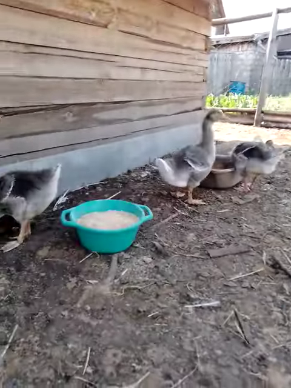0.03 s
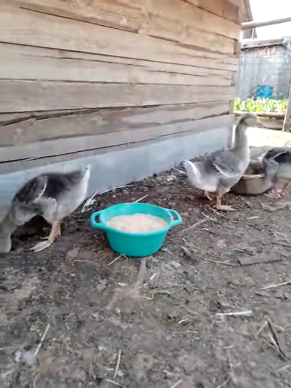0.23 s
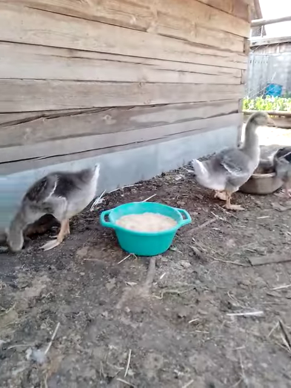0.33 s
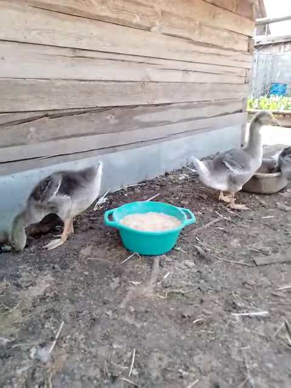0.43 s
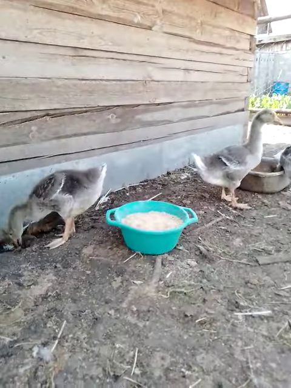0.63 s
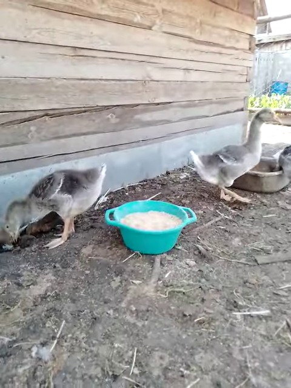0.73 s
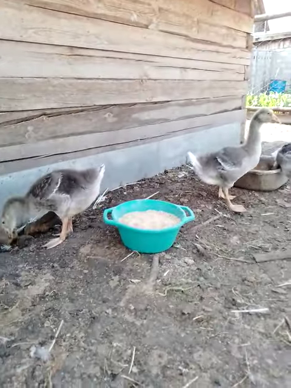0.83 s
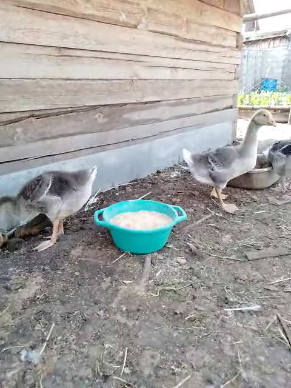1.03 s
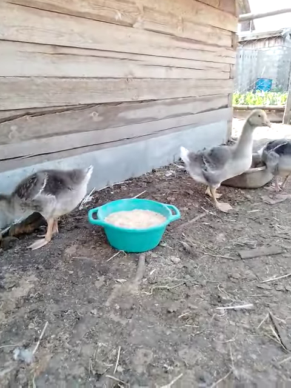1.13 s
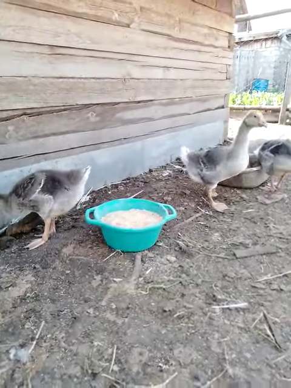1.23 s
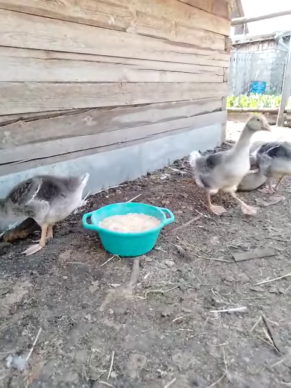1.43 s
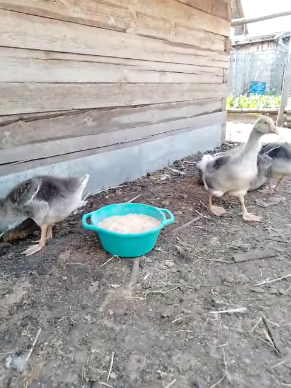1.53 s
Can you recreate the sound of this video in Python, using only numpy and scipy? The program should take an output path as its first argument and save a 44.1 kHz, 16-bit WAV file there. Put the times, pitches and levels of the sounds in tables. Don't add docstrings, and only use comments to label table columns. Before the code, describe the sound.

Young geese peep close by outdoors: faint chirps at first, one loud, bright arched peep near 0.25 s, then softer, duller overlapping peeps off a wooden wall until about 0.8 s. Small bill ticks start near 0.95 s, sharpest at 1.1 s, with short nasal honks at 1.1 and 1.25 s. A hoarse distant bird call echoes from 1.1 to 1.6 s over faint flock peeps, quiet hush and light wind rumble.

```python
import sys
import numpy as np
from scipy import signal
from scipy.fft import rfft, irfft, next_fast_len
from scipy.io import wavfile
from scipy.ndimage import uniform_filter1d, map_coordinates

SR = 44100
rng = np.random.default_rng(int(sys.argv[2]) if len(sys.argv) > 2 else 0)


def waveform_to_disk(signal):
    frames = np.transpose(np.atleast_2d(signal))
    scaled = np.clip(frames, -1, 1) * 32767
    samples = np.round(scaled).astype(np.int16)
    wavfile.write(sys.argv[1], SR, samples)


def ratio_of_db(decibels):
    return 10 ** (np.asarray(decibels, float) / 20)


N = 70560
T = np.arange(N) / SR


def unit(x):
    return x / np.sqrt(np.mean(x ** 2) + 1e-20)


def along(points, hz):
    f, v = np.transpose(points)
    return np.interp(np.log(hz + 1), np.log(f + 1), v)


def level(rows):
    return ratio_of_db(np.interp(T, *np.transpose(rows)))


def wobble(rate):
    return map_coordinates(rng.standard_normal(2000), [T * rate])


def filtered(x, response):
    m = next_fast_len(N + SR // 2)
    return irfft(rfft(x, m) * response(np.fft.rfftfreq(m, 1 / SR)), m)[:N]


def rush(spectrum):
    return unit(filtered(rng.standard_normal(N), lambda hz: ratio_of_db(along(spectrum, hz))))


def tail(x, t60):
    echoes = rng.standard_normal(SR // 2) * ratio_of_db(-60 * T[:SR // 2] / t60)
    return signal.fftconvolve(x, echoes / np.linalg.norm(echoes))[:N]


def voice(rows, fall_db, colour, count, flutter_db, fades=0, rasp_db=0):
    s, hz, db = np.transpose(rows)
    flutter_rate, jitter, rasp_rate = 150, 0.00395, 350
    pitch = uniform_filter1d(np.interp(T, s, hz), size=200)
    pitch = pitch * (1 + jitter * flutter_db * wobble(flutter_rate))
    sounding = (T > s[0]) * (T < s[-1])
    gain = ratio_of_db(np.interp(T, s, db) + flutter_db * wobble(flutter_rate)) * sounding
    gain = uniform_filter1d(gain, size=60)

    k = np.arange(1, count + 1)[:, None]
    turns = np.cumsum(pitch) / SR + rng.random()
    harmonic_db = fall_db * (k - 1) + along(colour, k * pitch)
    harmonic_db = harmonic_db + fades * (k == 2) * (T - s[0]).clip(0)
    if rasp_db:
        rasp = np.array([wobble(rasp_rate) for _ in k])
        harmonic_db = harmonic_db + rasp_db * rasp * (k - 1).clip(0, 3)
    return np.sqrt(2) * gain * (ratio_of_db(harmonic_db) * np.sin(2 * np.pi * k * turns)).sum(0)


def glide(s, length, first_hz, last_hz, db):
    mid_hz = (first_hz + last_hz) / 2
    return [(s, first_hz, db - 18),
            (s + 0.4 * length, (first_hz + mid_hz) / 2, db + 1.5),
            (s + 0.509 * length, mid_hz, db),
            (s + length, last_hz, db - 14.0)]


def facing_peeps():
    # time in seconds, pitch in Hz, level in dB.
    loud_arch = [(.228, 1582, -57), (.251, 1686, -36.5), (.265, 1766, -34), (.275, 1977, -30),
                 (.288, 2150, -32), (.303, 1980, -26), (.315, 1753, -31.5), (.329, 1609, -37.5),
                 (.358, 1405, -61)]
    early_arch = [(.084, 1540, -55), (0.099, 1600, -53), (0.124, 1643, -50), (.155, 1870, -64.5),
                  (0.174, 1790, -67)]
    # frequency in Hz, gain in dB.
    peep_throat = [(2300, 0), (3400, 6), (3950, -26), (4250, -36), (4900, -3), (5350, 1), (6200, -33),
                   (6750, -6), (7500, -45)]
    thin_throat = [(3300, 3), (3700, 9.5), (4600, -34), (6200, -19.5), (6600, -14), (7000, -36)]
    # start in seconds, length in seconds, first and last pitch in Hz, level in dB.
    thin_peeps = [
        (0.076, 0.1, 1613, 1448, -57),
        (0.783, 0.027, 1763, 1770, -63),
        (0.888, 0.023, 1690, 1750, -68.5),
    ]

    arched = sum(voice(rows, -11, peep_throat, count=4, flutter_db=1.2, fades=-130, rasp_db=1.6)
                 for rows in (loud_arch, early_arch))
    thin = sum(voice(glide(*g), -2, thin_throat, count=4, flutter_db=-1.0) for g in thin_peeps)
    return arched + filtered(thin, lambda hz: 1 / (1 + (2300 / (hz + 1)) ** 4))


def turned_peeps():
    # time in seconds, pitch in Hz, level in dB.
    first_arch = [(.405, 1400, -67), (.415, 1670, -61), (.432, 2050, -62), (.446, 2126, -54.5),
                  (.462, 2360, -64.5), (.477, 2220, -53), (.49, 2114, -57), (.508, 2220, -54),
                  (.518, 2330, -59.5)]
    second_arch = [(.47, 1500, -75.5), (0.494, 1722, -48.5), (.506, 1733, -42), (0.513, 1928, -48),
                   (0.525, 2500, -48.5), (.538, 2195, -58), (0.546, 1753, -50.5), (.565, 1500, -80.5)]
    third_arch = [(.526, 1390, -65.5), (0.537, 1754, -67), (.55, 2066, -50), (.557, 2202, -46.5),
                  (0.576, 2280, -47.5), (0.594, 2470, -55), (0.605, 2370, -52.5), (0.614, 1867, -52.5),
                  (.63, 1620, -85)]
    last_arch = [(0.669, 1488, -73), (0.689, 1696, -55), (0.703, 1758, -46), (.713, 1885, -45.5),
                 (.723, 2569, -49.5), (0.734, 2505, -59), (0.744, 1903, -49.5), (0.76, 1596, -78)]
    # start
    # in seconds, length in seconds, first and last pitch in Hz, level in dB.
    glides = [(-.02, 0.054, 1553, 1794, -55.5), (0.025, 0.014, 1458, 1350, -50),
              (0.107, 0.077, 1460, 1461, -55.5), (0.21, 0.027, 1350, 1425, -61.5),
              (0.281, 0.028, 1480, 1360, -51), (.325, 0.025, 1768, 1950, -46.5),
              (.326, 0.021, 2510, 2250, -54), (0.455, 0.019, 2830, 2850, -65),
              (0.578, 0.024, 2960, 2850, -56), (0.706, 0.039, 1895, 2290, -53),
              (0.72, 0.032, 2830, 2820, -72), (1.076, 0.022, 1433, 1620, -55), (1.241, .028, 560, 687, -61)]
    # frequency in Hz, gain in dB.
    turned_throat = [(1500, 0), (1750, 2), (1950, 0), (2500, 2), (3400, -1), (4200, -7), (5200, -10)]

    arched = sum(voice(rows, -16, turned_throat, count=2, flutter_db=4, rasp_db=4)
                 for rows in (first_arch, second_arch, third_arch, last_arch))
    return arched + sum(voice(glide(*g), 0, turned_throat, count=1, flutter_db=4.5) for g in glides)


def honks():
    # time in seconds, pitch in Hz, level in dB.
    first_honk = [(1.094, 791, -66), (1.104, 808.6, -50.5), (1.114, 813, -40), (1.121, 755, -43.5),
                  (1.128, 735.5, -43.5), (1.14, 745.7, -52.5), (1.158, 750, -61)]
    second_honk = [(1.252, 770, -52), (1.264, 825, -45.5), (1.274, 876.5, -47.5), (1.286, 900.5, -44.5),
                   (1.309, 919.4, -41), (1.318, 941, -58), (1.328, 890, -61)]
    # frequency in Hz, gain in dB.
    first_throat = [(740, -3.5), (800, -2.5), (1490, 15), (1590, -8), (2350, 1), (3100, 4), (4000, 3.5),
                    (5500, -24)]
    second_throat = [(820, -15.5), (890, 1), (920, -7.5), (1840, 9.5), (2700, 0.5), (3650, -0.5),
                     (4500, -17), (5300, -6), (5600, -27.5)]
    return sum(voice(rows, -4, colour, count=7, flutter_db=1.88, rasp_db=2.2)
               for rows, colour in ((first_honk, first_throat), (second_honk, second_throat)))


def wall_echo(away):
    dull = filtered(away, lambda hz: 1 / (1 + (hz / 3000) ** 6))
    bounces = np.zeros(SR // 10)
    delay_s = rng.random(7) * 0.018
    bounces[(delay_s * SR + 40).astype(int)] = ratio_of_db(-9) * rng.choice([-1, 1], 7)
    return signal.fftconvolve(dull, bounces)[:N] + tail(dull, 0.065)


def air(near):
    # frequency in Hz, density in dB per Hz.
    breath = [(1000, -28), (1500, 2), (2600, 0.5), (4000, -3), (5700, -9), (6800, -32)]
    loudness = np.sqrt(np.abs(uniform_filter1d(near ** 2, size=500)))
    return ratio_of_db(-29.5) * loudness * rush(breath)


def ticks_and_feet():
    # start in seconds, ring in dB, ring pitch in Hz, snap in dB, snap band top in Hz.
    bill_ticks = [
        (0.9593, -45.5, 3230, -39.5, 8700),
        (0.988, -71, 6100, -58.5, 13400),
        (1.037, -52, 2310, -43.5, 10900),
        (1.054, -57, 5000, -54.5, 14100),
        (1.0986, -45.5, 3260, -52, 9900),
        (1.1105, -33.5, 4450, -49, 9500),
        (1.1103, -21.5, 3095, -29, 5000),
        (1.11, -41.5, 7020, -67, 14000),
        (1.1422, -41.5, 4350, -77, 4370),
        (1.141, -31.5, 3000, -68, 3970),
    ]
    # start in seconds, level in dB, pitch in Hz.
    thuds = [
        (0.391, -59.5, 378),
        (1.111, -65, 337),
        (1.142, -65, 305),
    ]
    ring_t60, snap_t60, thud_t60 = 0.009, 0.003, 0.05

    x, t = np.zeros(N + SR), T[:SR // 10]
    for s, ring_db, hz, snap_db, top_hz in bill_ticks:
        ring = np.sin(2 * np.pi * hz * t) * ratio_of_db(ring_db - 60 * t / ring_t60)
        ring = ring * (1 - np.exp(-t / 0.00013))
        band = signal.butter(3, [2100, min(top_hz, 20000)], "band", fs=SR, output="sos")
        snap = signal.sosfilt(band, rng.standard_normal(len(t)) * ratio_of_db(snap_db - 60 * t / snap_t60))
        x[round(s * SR):][:len(t)] += ring + snap
    for s, db, hz in thuds:
        thud = ratio_of_db(db - 60 * t / thud_t60) * np.sin(2 * np.pi * hz * t)
        x[round(s * SR):][:len(t)] += thud * (1 - np.exp(-t / 0.00066))
    return x[:N]


def resonances(peaks):
    low_hz, top_hz, widen = 623, 4500, 0.87

    def response(f):
        total = 0
        for centre, width, db in peaks:
            damping = 1j * f * width * widen
            total = total + ratio_of_db(db) * damping / (centre * centre - f * f + damping)
        return total / (1 + (f / top_hz) ** 14) / (1 + (low_hz / (f + 1)) ** 6)
    return response


def far_call():
    # time in seconds, pitch in Hz, level in dB.
    contour = [(1.1, 780, -64), (1.113, 780, -54.5), (1.25, 832.5, -51), (1.33, 681.2, -51),
               (1.521, 657.9, -58), (1.6, 647, -63.5)]
    # centre in Hz, width in Hz, gain in dB.
    opening = [(830, 120, -4.5), (1640, 134, 0.5), (2050, 150, -0.5), (2430, 110, -3), (3000, 120, 5),
               (3910, 510, -17), (4030, 150, -10.5)]
    straining = [(756, 73, -7), (1500, 170, -2.5), (1930, 220, -4), (2500, 92, -6), (3205, 120, 7),
                 (3750, 120, -18.5), (4450, 100, -11)]
    late = [(780, 30, -2.5), (1192, 40, 1.5), (1604, 220, -0.5), (1980, 180, -4.5), (2500, 68, 2),
            (3468, 110, 6), (3676, 170, 1)]
    closing = [(1168, 30, 7), (1670, 170, -10), (1916, 63, 0.5), (2650, 88, -1), (3365, 62, 5.5),
               (3700, 130, -9)]
    shape_s = [1.149, 1.25, 1.411, 1.57]
    # frequency in Hz, density in dB per Hz.
    wash = [(200, -37.5), (350, -6.5), (1150, -22), (1500, -2.5), (3500, -11), (4500, -17), (5300, -41.5)]
    rough, jitter = 0.81, 0.04015

    s, hz, db = np.transpose(contour)
    turns = np.cumsum(np.interp(T, s, hz) * (1 + jitter * wobble(200))) / SR
    gate = np.exp(9 * (np.cos(2 * np.pi * turns) - 1))
    pulses = unit(np.gradient(gate))
    breath = unit(gate ** 0.21 * rng.standard_normal(N))
    source = (1 - rough) * pulses + rough * breath

    call = 0
    shapes = (opening, straining, late, closing)
    for peaks, share in zip(shapes, np.eye(len(shapes))):
        weight = np.sin(np.pi / 2 * np.interp(T, shape_s, share))
        call = call + weight * unit(filtered(source, resonances(peaks)))
    direct = call + ratio_of_db(-12) * rush(wash)
    direct = direct * ratio_of_db(np.interp(T, s, db) + 2.2 * wobble(90)) * (T > s[0])
    return ratio_of_db(1.0) * (direct + ratio_of_db(-6.5) * tail(direct, 0.69))


def far_flock():
    # frequency in Hz, density in dB per Hz.
    peeping = [(900, -23.5), (1500, -10.5), (3600, 2), (4600, -9), (5800, -26)]
    # time in seconds, level in dB.
    flock_level = [(0, -65), (.2, -77.5), (.4, -70.5), (.9, -69.5), (1.02, -75.5)]
    return unit(rush(peeping) * ratio_of_db(2.5 * wobble(60))) * level(flock_level)


def yard():
    # frequency in Hz, density in dB per Hz.
    hush_spectrum = [(120, -39.5), (200, -1.5), (2430, -10), (3060, -14.5), (3660, -13), (14200, -29)]
    # time in seconds, level in dB.
    drone_level = [(.1, -75.5), (.2, -80), (.6, -84.5), (1.6, -83)]
    hush = filtered(rush(hush_spectrum), lambda hz: 1 / (1 + (200 / (hz + 1)) ** 8))
    drone = rush([(190, -24.0), (320, -3.5), (900, -32.0)]) * level(drone_level)
    return ratio_of_db(-75.5) * hush + drone


def wind():
    # frequency in Hz, density in dB per Hz.
    rumble = [(8.8, -26.5), (15, 2), (38, 0), (70, -5), (150, -26), (220, -61.5), (370, -120)]
    # time in seconds, strength in dB.
    gusts = [(.12, -62), (.2, -71.5), (.3, -58), (.325, -57), (.36, -70.5), (.7, -75.5), (1.6, -78)]
    return unit(rush(rumble) * ratio_of_db(1.7 * wobble(9.1))) * level(gusts)


def scene():
    away = turned_peeps()
    near = facing_peeps() + honks() + away + wall_echo(away)
    hits = ticks_and_feet()
    close = near + ratio_of_db(-14) * tail(near, 0.16) + air(near) + hits + ratio_of_db(-16.5) * tail(hits, 0.053)
    return (close + far_call() + far_flock() + yard() + wind())[None]


def roll_off(x):
    return signal.sosfilt(signal.butter(12, 14630, fs=SR, output="sos"), x)


def record(dry):
    limited = filtered(dry[0], lambda hz: hz < 14450)[None]
    mix = limited - 0.0004
    return roll_off(mix)


dry = scene()
out = record(dry)
waveform_to_disk(out)
```